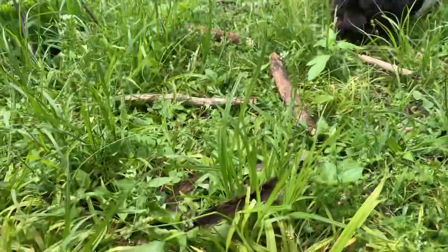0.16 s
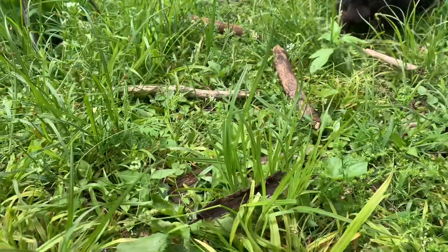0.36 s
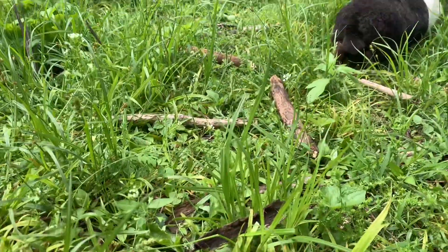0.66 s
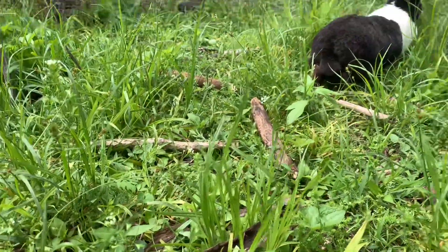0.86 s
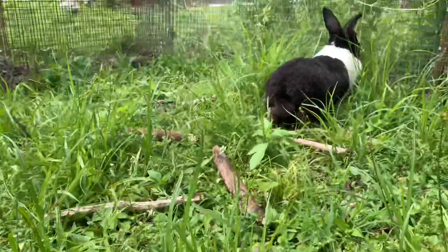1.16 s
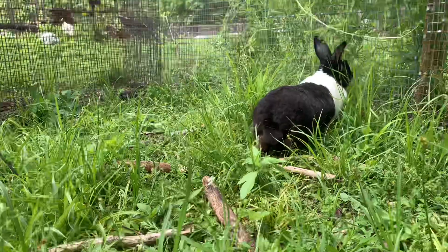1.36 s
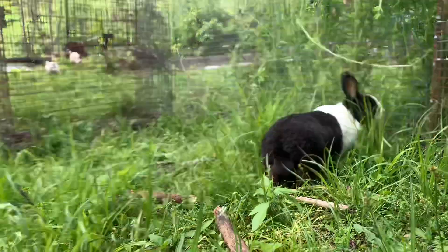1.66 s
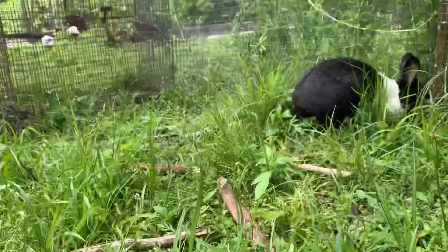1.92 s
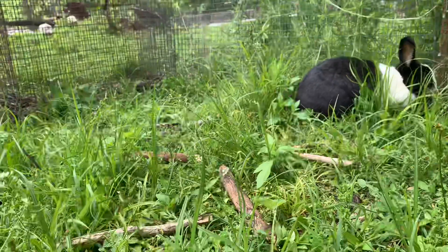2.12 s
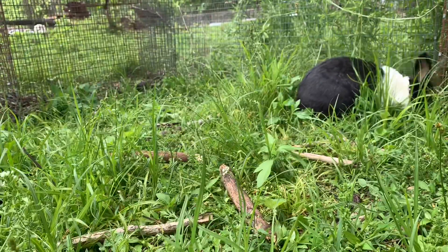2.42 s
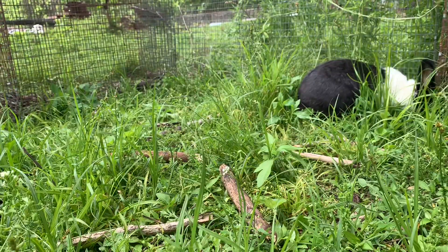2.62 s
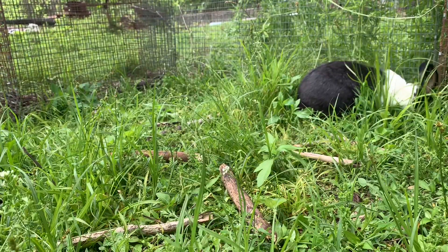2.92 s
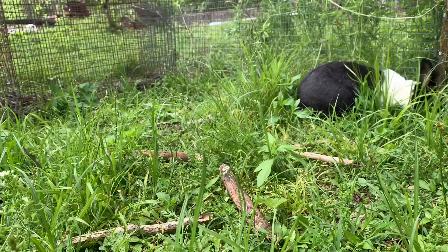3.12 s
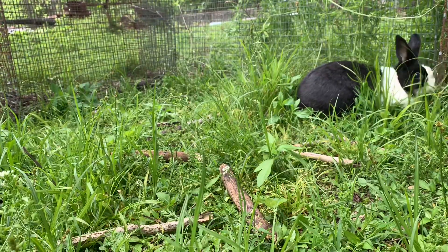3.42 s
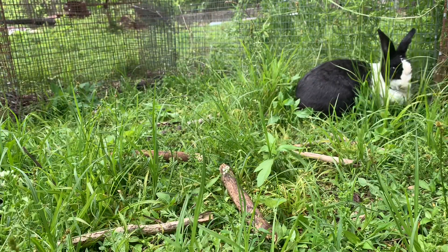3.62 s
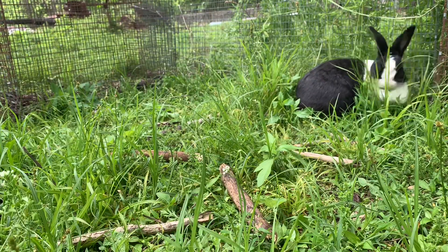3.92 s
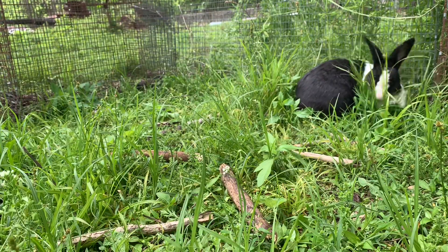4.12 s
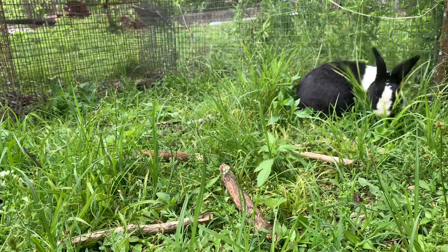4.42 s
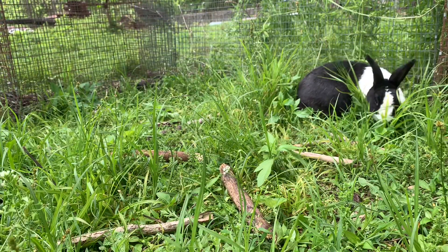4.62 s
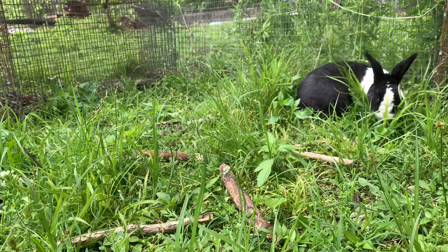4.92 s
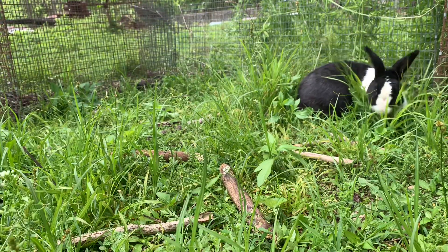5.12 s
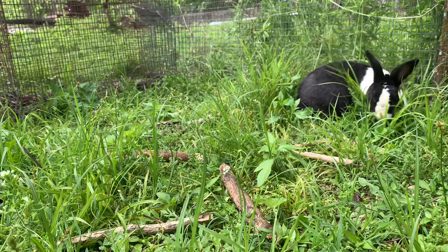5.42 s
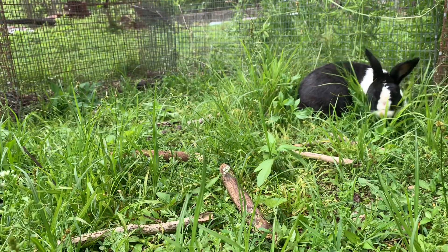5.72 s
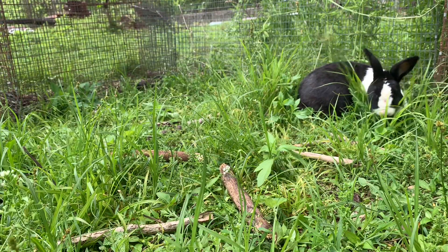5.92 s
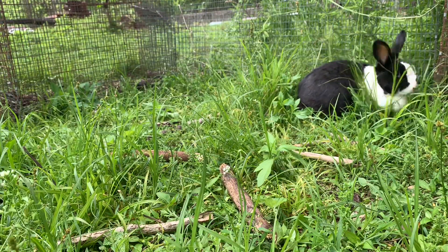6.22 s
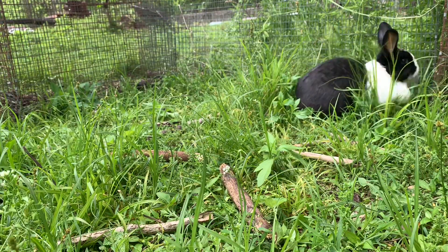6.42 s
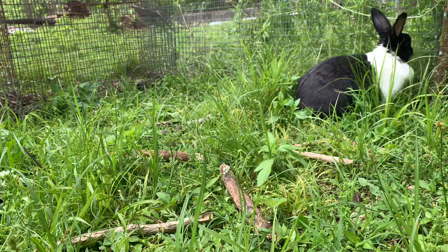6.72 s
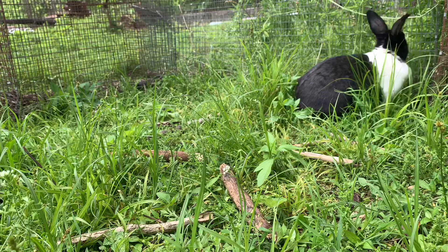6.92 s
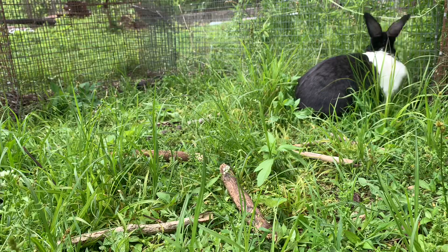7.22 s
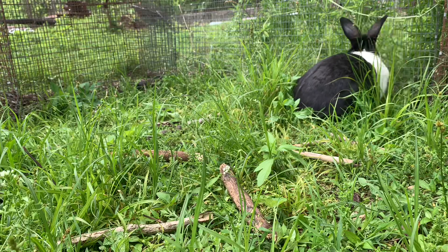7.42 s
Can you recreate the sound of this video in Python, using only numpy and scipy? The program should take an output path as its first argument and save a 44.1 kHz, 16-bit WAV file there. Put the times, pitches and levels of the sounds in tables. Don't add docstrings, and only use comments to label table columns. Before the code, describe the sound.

Outdoor grassy pen, close dry microphone: loud brittle stem cracks and thumps open the scene, then give way to quieter bites, hollow taps and moist chewing. A songbird repeats quick sliding phrases at the start, middle and near the end, with trills and very high thin whistles from others. Leaves hiss softly over a smooth, low distant traffic hum; late on, fine snaps and short fence rasps appear.

```python
import sys
import numpy as np
from scipy import signal
from scipy.fft import rfft, irfft
from scipy.io import wavfile
from scipy.ndimage import uniform_filter1d

SR = 44100
rng = np.random.default_rng(int(sys.argv[2]) if len(sys.argv) > 2 else 0)


def gain_from_db(level_db):
    decades = np.asarray(level_db, float) / 20
    return 10 ** decades


def dump(signal):
    limited = np.clip(np.atleast_2d(signal).T, -1, 1)
    pcm = np.round(limited * 32767).astype(np.int16)
    wavfile.write(sys.argv[1], SR, pcm)


N = 333396
TIME = np.arange(N) / SR
HZ = np.fft.rfftfreq(N, 1 / SR) + 1e-3


def at_hz(points, hz):
    return np.interp(np.log(hz), np.log(np.array(points)[:, 0]), np.array(points)[:, 1])


def curve(rows):
    return np.interp(TIME, *np.transpose(rows))


def drift(rate):
    knots = rng.standard_normal(400)
    return np.interp(TIME * rate * 2, np.arange(400), knots) * 1.04


def band(x, low_hz, high_hz):
    return signal.sosfilt(signal.butter(2, [low_hz, high_hz], "band", fs=SR, output="sos"), x)


def swells(rows, rest_db, axis=2):
    s = TIME[::100]
    power = gain_from_db(2 * rest_db)
    for row in rows:
        middle_s, length_s = row[:2]
        power = power + gain_from_db(2 * row[axis]) * np.exp(-2 * (2 * (s - middle_s) / length_s) ** 2)
    return np.interp(TIME, s, 10 * np.log10(power))


def foliage(x, t60, wet_db, wait_s=0):
    age = np.arange(int(.6 * SR)) / SR
    rise = np.clip((age - wait_s) / 0.0054, 0, 1)
    tail = rng.standard_normal((2, len(age))) * gain_from_db(-60 * age / t60) * rise
    tail = tail / np.sqrt((tail ** 2).sum(axis=1, keepdims=True))
    return gain_from_db(wet_db) * signal.fftconvolve(x[None], tail, axes=1)[:, :N]


def placed(x, pan_db, lag):
    late = np.interp(np.arange(N) - lag, np.arange(N), x)
    return np.array([x * gain_from_db(pan_db / 2), late * gain_from_db(-pan_db / 2)])


def sing(notes, starts=((0, 0),), second_db=-40, flutter_db=2.5):
    flutter = uniform_filter1d(rng.standard_normal(N), size=150) * 12
    out = np.zeros(N)
    for start, level_db in starts:
        for note in notes:
            s, hz, db = np.transpose(note)
            t = np.arange(max(start + s[0], 0), min(start + s[-1], TIME[-1]), 1 / SR)
            turn = 2 * np.pi * np.cumsum(np.interp(t - start, s, hz)) / SR
            edge = np.clip(np.minimum(t - t[0], t[-1] - t) / 0.00092, 0, 1)
            edge = edge * gain_from_db(flutter_db * flutter[(t * SR).astype(int)])
            wave = np.sin(turn) + gain_from_db(second_db) * np.sin(2 * turn)
            level = np.sqrt(2) * gain_from_db(np.interp(t - start, s, db) + level_db)
            first = int(t[0] * SR)
            out[first:first + len(t)] += edge * level * wave
    return out


def glides(rows, change_db):
    return [[(s, from_hz, db), (s + length, to_hz, db + change_db)] for s, length, from_hz, to_hz, db in rows]


def run_of(start, gap, db, count):
    return [(start + gap * k, db) for k in range(count)]


# start in seconds [s], crack peak level [dB], low thump against the crack [dB].
DRY_STEMS = [
    (.1138, -46.5, -1.5),
    (.739, -42.5, -6.5),
    (.756, -45, -8),
    (1.1896, -65.5, 5),
    (1.6466, -41.5, 1),
    (1.8063, -60, 13),
    (5.7815, -43, -32),
]
GREEN_STEMS = [(.6708, -24, 5), (1.5706, -49.5, -21), (1.5937, -48, 4.5), (1.608, -52, -8),
               (1.6122, -43, -22), (1.6318, -40.5, -0.5), (1.637, -43, -10), (1.652, -40, -13),
               (1.666, -44.5, -11), (1.6765, -23, -12.5), (1.6918, -38, -11), (1.7185, -45.5, 4),
               (1.732, -27.5, 2), (1.4, -49, 5.5), (1.8878, -31.5, 0), (1.894, -43, -3), (1.5, -53.5, -3),
               (1.928, -42.5, -3), (5.11, -59, -19), (5.427, -55, -21), (5.8186, -35, -27),
               (5.8678, -47, -25), (5.8885, -38.5, -29), (5.9192, -43.5, -21), (6.005, -50, -13)]
CRISP_STEMS = [(.0962, -47, 4.5), (.2625, -52, -13), (.567, -36, -21), (.6578, -36, -11), (.692, -43, -29),
               (1.0357, -39.5, -5), (1.049, -40.5, -9), (1.6612, -43, 4), (1.6752, -41.5, -25),
               (1.6845, -35.5, -12), (1.7143, -42, -1), (1.7303, -23, -25), (1.7635, -38, -0.5),
               (1.7726, -34, -8), (1.8708, -43.5, -1.5), (6.0871, -50.5, -20)]
THIN_BLADES = [
    (.0145, -60, 10),
    (.031, -64, 0),
    (.6682, -34.5, 1.5),
    (.6702, -35, -14.5),
    (.6755, -41.5, -12),
    (.698, -57, -11),
    (.7035, -61, 3),
    (1.9861, -68.5, 18),
    (5.1603, -66, 1),
]


def snap_swing(age):
    slow = -np.sin(2 * np.pi * 210 * age) * np.exp(-age / 0.0031) * np.clip(age / 0.0049, 0, 1)
    quick = -.5 * np.sin(2 * np.pi * 620 * age) * np.exp(-age / 0.0013)
    ring_hz = 450 + 2566 * np.exp(-age / 0.001182)
    ring = np.sin(2 * np.pi * np.cumsum(ring_hz) / SR) * np.exp(-age / 0.0022)
    return slow + quick + 0.19 * ring


def snaps():
    out, age = np.zeros((2, N)), np.arange(2200) / SR
    swing = snap_swing(age)
    kinds = [(DRY_STEMS, -60), (GREEN_STEMS, -8), (CRISP_STEMS, 1), (THIN_BLADES, 14.5)]
    for (s, db, thump_db), fizz_db in [(row, fizz) for rows, fizz in kinds for row in rows]:
        burst = np.exp(-age / 0.0016) * np.clip(age / 0.00074, 0, 1)
        mid, side = rng.standard_normal((2, len(age))) * burst
        crack = band(mid + 0.28 * side * [[1], [-1]], 660, 3570)
        airy = mid + 1.2 * side * [[1], [-1]]
        fizz = band(airy, 3600, 9300) + 1.13 * band(airy, 5400, 6850)
        sharp = crack / abs(crack).max() + gain_from_db(fizz_db) * fizz / abs(fizz).max()
        bounce = gain_from_db(-18 + 2 * rng.normal())
        sharp = sharp + bounce * np.roll(sharp, int(0.004 * SR * rng.uniform(0.73, 1.6)), axis=1)
        sharp = np.array([sharp[0], np.interp(age - 3.2 / SR, age, sharp[1])])
        lean = gain_from_db(rng.normal(1.0, 0.73) * np.array([[1], [-1]]))
        first = int(s * SR)
        out[:, first:first + len(age)] += gain_from_db(db) * (sharp * lean + gain_from_db(thump_db + 11.5) * swing)
    return out


# start in seconds [s],
# peak level [dB], pitch [Hz], glide as a share of the pitch [ratio], length [ms].
HOLLOW_KNOCKS = [(.027, -36.5, 1140, 0.06, 11), (0.13, -39.5, 1238, 0, 19), (.484, -47.5, 1290, 0.16, 10),
                 (0.8, -42.5, 756, 0.094, 16), (1.34, -43, 790, 0, 18), (1.547, -37, 1203, 0.11, 11),
                 (1.762, -34, 1170, 0.21, 15), (2.656, -39.5, 1214, 0.26, 14), (3.128, -49, 1480, 0, 12),
                 (3.545, -52.5, 994, 0.026, 15), (3.715, -55.5, 1020, 0, 12), (4.039, -38, 1245, 0.52, 9.2),
                 (4.667, -55.5, 1173, 0, 37), (4.696, -48, 1090, 0.06, 19), (4.749, -46.5, 1150, 0.073, 11),
                 (5.482, -50, 945, 0.32, 7.6), (6.323, -55.5, 895, 0.13, 18), (6.681, -54, 680, 0, 16),
                 (6.94, -38.5, 1188, 0.24, 18.6), (7.085, -37, 1150, 0.27, 18),
                 (2.587, -41.5, 1374, 0.3, 9.8), (2.746, -46.5, 1630, -0.36, 13),
                (2.811, -47, 1490, 0.24, 13.3), (2.874, -42.5, 1670, -.25, 14.4),
                (2.974, -44, 1637, -0.49, 15.7), (2.948, -57, 1390, 0.3, 5.9),
                (3.242, -47, 1760, -0.16, 10), (3.373, -46, 1960, 0, 12), (4.247, -42, 1680, 0.21, 10.5),
                (4.494, -48, 1676, -0.089, 7), (4.622, -40, 1574, 0.099, 10),
                (4.731, -55, 2100, -0.023, 9.7), (5.756, -40, 1532, 0.25, 15),
                (5.894, -47, 1620, -0.23, 7.5), (6.027, -49, 1600, -0.025, 9),
                (6.184, -46, 1680, 0.077, 9.4), (7.259, -51, 1715, 0.2, 8.6)]


def knocks():
    out, age = np.zeros(N), np.arange(1800) / SR
    for s, db, hz, glide, ms in HOLLOW_KNOCKS:
        part = np.clip(age * 1000 / ms, 0, 1)
        puff = rng.standard_normal(1800) * np.sin(np.pi * part ** 0.94)
        breath = band(puff, hz * 0.65, hz * 1.27) + 0.79 * puff
        breath = band(band(breath, 564, hz * 1.45), 560, 1920)
        ring = np.sin(2 * np.pi * np.cumsum(hz * (1 + glide * (part - .5))) / SR)
        ring = ring * np.sin(np.pi * part ** 0.96)
        body = breath / abs(breath).max() + 0.78 * ring
        thud = band(rng.standard_normal(1800) * age * np.exp(-age / 0.0043), 506, 1060)
        body = body + 0.5 * thud / abs(thud).max()
        first = int(s * SR) - 60
        out[first:first + 1800] += gain_from_db(db) * body / abs(body).max()
    return out


# middle in seconds [s], length in seconds [s], level [dB].
CHEWING_BOUTS = [(.07, 0.28, -66), (.75, 0.73, -72.5), (1.64, 0.13, -61.5), (1.9, 0.18, -65),
                 (2.75, 0.98, -82), (3.17, 0.77, -70), (3.66, 0.11, -80), (4.68, 0.44, -72.5),
                 (5.05, 1, -76), (5.8, .5, -98), (6.49, 0.11, -70.5), (6.66, 0.071, -65),
                 (6.98, 0.068, -61.5), (4.64, 0.044, -66), (2.82, 0.036, -72), (7.15, 0.55, -78.5)]


def chewing():
    born = (rng.random(N) < 700 / SR) * gain_from_db(3.0 * np.minimum(rng.exponential(1, N), 3))
    born = born * rng.standard_normal(N)
    dealt = rng.integers(0, 8, N)
    out = np.zeros(N)
    for k, hz in enumerate(np.geomspace(700, 2000, 8)):
        out += band(born * (dealt == k) + 1e-18, hz * 0.95, hz * 1.1) / hz ** 1.75
    return out / out.std() * gain_from_db(swells(CHEWING_BOUTS, rest_db=-84) - 2.5)


# start in seconds [s], level [dB], length in seconds [s].
FENCE_RUBS = [
    (6.187, -65.5, 0.05),
    (6.677, -66, 0.053),
    (7.098, -64, 0.035),
    (7.52, -61, 0.079),
]
# pitch [Hz], width [Hz], level [dB].
WIRE_TONES = [(840, 490, -6.5), (2270, 160, -8), (3125, 133, -9), (3770, 230, -11.5), (4360, 180, -18)]


def fence():
    noise = rng.standard_normal(N)
    rub = np.zeros(N)
    for s, db, length in FENCE_RUBS:
        rub += gain_from_db(db) * np.sin(np.pi * np.clip((TIME - s) / length, 0, 1)) ** 0.25
    rasp = np.zeros(N)
    for hz, width, db in WIRE_TONES:
        line = band(noise, hz - width / 2, hz + width / 2)
        rasp += gain_from_db(db + 5.0 * drift(15)) * line / line.std()
    return rub * rasp


# start in seconds [s], length in seconds [s], first pitch [Hz],
# last pitch [Hz], starting level [dB].
LOW_PEEPS = [(3.37, 0.014, 1843, 1770, -44), (5.23, 0.034, 2140, 2020, -67), (7.0, 0.04, 2100, 2050, -70.5),
             (4.5, 0.039, 1594, 1440, -74), (4.735, 0.043, 2010, 2380, -65), (4.94, .03, 1470, 1250, -70),
             (5.05, .05, 1310, 1270, -78), (5.745, 0.011, 2300, 2220, -65.5), (7.1, 0.042, 930, 873, -52),
             (6.195, 0.024, 890, 850, -57), (6.69, 0.042, 895, 950, -59), (7.085, .02, 2250, 2300, -67),
             (7.425, 0.034, 2014, 1853, -62.5)]


def peeps():
    return sing(glides(LOW_PEEPS, change_db=-18))


# seconds from the turn [s], pitch [Hz], level [dB].
SONG_HIGH = [
    [(0, 5830, -11.5), (.03, 5530, -3.5), (.055, 5200, -9.5), (.075, 5100, -15)],
    [(.15, 9940, -13.5), (.16, 6600, -8)],
    [(.19, 8080, -4.5), (.207, 6080, -6.5)],
]
SONG_LOW = [
    [(-.082, 3950, -17), (-.05, 4550, -14.5), (-.02, 4620, -10), (0, 4580, -25)],
    [(.082, 3750, -16), (.096, 4250, -13), (.11, 3900, -14)],
    [(.167, 4600, -13), (.176, 5300, -4), (.192, 5300, -30)],
]
# start in seconds [s], level [dB], low notes against the high ones [dB].
SONG_TURNS = [
    (.228, -41.5, -2),
    (0.522, -42, -1.5),
    (3.693, -42.5, -0.5),
    (4.001, -42.5, 3.5),
    (6.265, -39, 1),
    (6.572, -39, 4),
]
# seconds from its start [s], pitch [Hz], level [dB].
CHIP_NOTE = [
    [(0, 8030, 31.5), (.02, 6300, 21)],
]
# start in seconds [s], level [dB].
LONE_CHIPS = [
    (0.097, -78),
    (3.56, -85),
    (4.174, -77),
    (6.148, -78),
]


def songbird():
    high = sing(SONG_HIGH, [(s, db) for s, db, low_db in SONG_TURNS])
    low = sing(SONG_LOW, [(s, db + low_db) for s, db, low_db in SONG_TURNS])
    five_chips = run_of(4.608, 0.159, -84.5, count=5)
    return high + low + sing(CHIP_NOTE, LONE_CHIPS + five_chips)


# seconds from its start [s], pitch [Hz], level [dB].
TRILL_OPENING = [
    [(0, 5870, -2), (.02, 5230, -2.5)],
    [(.022, 4950, 3), (.038, 3700, -16), (.07, 4570, -2.5)],
]
# start in seconds [s], level [dB].
TRILL_STARTS = [
    (2.206, -56.5),
    (5.579, -60.5),
]


def trill():
    notes = list(TRILL_OPENING)
    starts_s = 0.1 + 0.022 * np.arange(10)
    for s, hz, db in zip(starts_s, np.geomspace(6600, 4240, 10), np.linspace(0, -5.0, 10)):
        notes.append([(s, hz * 0.93, db), (s + 0.0085, hz * 1.114, db)])
    return sing(notes, TRILL_STARTS)


# start in seconds [s], length in seconds [s],
# first pitch [Hz], last pitch [Hz], starting level [dB].
GROWING_NOTES = [(4.803, 0.0051, 15500, 11500, -58), (6.125, 0.0083, 14000, 11300, -71),
                 (.955, 0.069, 4000, 6140, -84), (1.005, .035, 6140, 5910, -69),
                 (1.93, 0.088, 7100, 9000, -77), (2.04, 0.041, 9000, 5940, -72),
                 (2.735, 0.011, 4700, 6000, -73.5), (2.825, 0.018, 4350, 5530, -79.5),
                 (3.252, 0.0235, 5900, 6870, -80), (3.328, 0.013, 5500, 8640, -78),
                 (5.51, 0.031, 5660, 12040, -69.5), (6.12, 0.027, 4200, 5700, -77.5)]
FADING_NOTES = [(.905, .05, 6840, 4100, -85), (1.07, 0.01, 7160, 6600, -59),
                (2.135, 0.019, 4950, 9330, -60.5), (2.145, 0.14, 6500, 5830, -75),
                (3.017, 0.016, 6700, 5910, -71), (3.075, .02, 9000, 5800, -72),
                (3.458, .012, 5500, 7100, -62), (3.472, .01, 7140, 5940, -63),
                (3.04, .012, 6800, 6030, -71), (3.28, 0.026, 7000, 6000, -74),
                (.035, .035, 7550, 8100, -70), (.075, .02, 4480, 5330, -61),
                (4.01, 0.063, 6680, 6650, -65.5), (7.21, 0.042, 11600, 6140, -76.5),
                (7.35, 0.012, 11050, 10400, -68), (7.455, 0.018, 6600, 5800, -72)]


def single_notes():
    return sing(glides(GROWING_NOTES, change_db=12.5) + glides(FADING_NOTES, change_db=-4))


# seconds from its start [s], pitch [Hz], level [dB].
SLIDE_NOTE = [
    [(-.004, 15800, 4), (.014, 14000, 4), (.024, 13300, 4), (.037, 9800, 2), (.041, 8200, -4)],
]
DROP_NOTE = [
    [(0, 13200, -5), (.012, 10330, 1), (.026, 9500, 1)],
]
RISE_NOTE = [
    [(0, 9270, 5), (.018, 12970, 1.5), (.026, 12900, 10)],
]
# start in seconds [s], level [dB].
SLIDE_STARTS = [(.215, -70), (0.335, -63), (0.454, -62.5), (0.567, -60.5), (.775, -64), (1.22, -76),
                (3.849, -96), (3.957, -74), (4.06, -69), (4.165, -66), (4.69, -84), (5.27, -71.5),
                (5.388, -69.5), (5.494, -72)]
RISE_STARTS = [
    (.88, -65),
    (.955, -63.5),
    (4.28, -67),
    (4.343, -69.5),
    (4.434, -74),
    (4.517, -70),
    (5.619, -69.5),
    (5.715, -70),
]
# start in seconds [s], gap in seconds [s], level [dB].
DROP_RUNS = [
    (7.028, .051, -78),
    (7.422, .06, -74),
]


def thin_notes():
    drops = run_of(*DROP_RUNS[0], count=3) + run_of(*DROP_RUNS[1], count=3)
    return sing(SLIDE_NOTE, SLIDE_STARTS) + sing(DROP_NOTE, drops) + sing(RISE_NOTE, RISE_STARTS)


# time in seconds [s], pitch [Hz], level [dB].
FAR_WHISTLES = [
    [(0, 1288, -62.5), (.3, 1291, -65.5), (.56, 1220, -62.5), (.59, 1270, -81)],
    [(4.003, 2227, -44), (4.02, 2228, -38), (4.037, 2225, -51)],
    [(4.042, 2230, -52), (4.052, 2220, -45), (4.06, 2210, -52)],
    [(4.062, 2133, -49), (4.085, 2107, -38), (4.12, 2087, -46.5), (4.138, 2090, -49)],
]
# start in seconds [s], length in seconds [s], first pitch [Hz], last pitch [Hz], level [dB].
SLOW_MOAN = [
    (5.96, 0.22, 704, 918, -73),
]


def far_whistles():
    return sing(FAR_WHISTLES, second_db=-15, flutter_db=0.8) + sing(glides(SLOW_MOAN, change_db=1.5))


# pitch [Hz], side against middle [dB].
NOISE_WIDTH = [(60, -29), (110, -18.5), (380, -14), (700, -10), (2380, 1), (15000, 0.5)]


def coloured(spectrum, source):
    gain = gain_from_db(at_hz(spectrum, HZ))
    width = gain_from_db(at_hz(NOISE_WIDTH, HZ))
    mid, side = irfft(rfft(source) * gain * [np.ones(len(HZ)), width], N)
    return np.array([mid + side, mid - side]) / mid.std()


# pitch [Hz], level per Hz [dB].
LEAF_COLOUR = [(410, -30), (700, -0.5), (1080, -3), (1220, -10), (2490, -7), (4280, -7.5), (5090, -7),
               (14600, -14), (15900, -14), (16500, -29)]
# middle in seconds [s], length in seconds [s],
# coarse stems [dB], fine blades [dB].
GRASS_STIRS = [(0.0, 0.23, -89, -82.5), (.62, 0.97, -89, -81), (.88, 0.42, -109, -80),
               (1.35, 0.36, -95, -87), (1.7, 0.35, -94.5, -88.5), (2.04, 0.34, -90, -80),
               (2.8, 0.13, -91, -90.5), (3.16, 0.17, -84.5, -76), (3.36, 0.21, -85, -84.5),
               (3.345, 0.022, -79, -71), (3.66, .3, -77.5, -79.5), (3.87, 0.091, -82, -74),
               (4.08, 0.3, -80.5, -76.5), (4.24, 0.058, -75, -74), (4.305, 0.037, -78, -87),
               (4.4, 0.44, -111, -86.5), (4.82, 0.12, -111, -83), (5.62, 0.055, -76.5, -84),
               (5.87, .2, -80.5, -99), (6.15, 0.16, -88, -80)]


def rustle():
    grains = (rng.random((2, N)) < 2500 / SR) * gain_from_db(3.0 * np.minimum(rng.exponential(1, (2, N)), 3))
    leaves = rfft(coloured(LEAF_COLOUR, rng.standard_normal((2, N)) * (1 + 1.8 * grains)))
    gusts_db = 1.6 * drift(9)
    stems_db = swells(GRASS_STIRS, rest_db=-96.5)
    blades_db = swells(GRASS_STIRS, rest_db=-91.5, axis=3)
    place = np.clip(np.log2(HZ / 2000) * 2, 0, 6)
    out = np.zeros((2, N))
    for k, share in enumerate(np.clip(np.linspace(-.3, 1.2, 7), 0, 1)):
        level_db = (1 - share) * (stems_db + 16) + share * (blades_db + 13)
        patch_db = 2.4 * drift(16) + gusts_db
        strip = irfft(leaves * np.clip(1 - abs(place - k), 0, 1), N)
        out += strip * gain_from_db(level_db + patch_db)
    return out


# time in seconds [s], level [dB].
MOTOR_LEVEL = [(0, -57.5), (1.0, -53.5), (2.0, -60), (3.2, -60.5), (4.5, -67), (4.8, -58), (5.35, -56),
               (5.6, -64), (5.85, -59.5), (6.15, -54.5), (6.3, -68.5), (7.55, -65)]


def motor():
    turn = 2 * np.pi * np.cumsum(248.3 + 1.515 * drift(2.5)) / SR
    return np.sqrt(2) * gain_from_db(curve(MOTOR_LEVEL) - 1) * (np.sin(turn) + gain_from_db(-18.5) * np.sin(2 * turn))


# pitch [Hz], level per Hz [dB].
HUM_COLOUR = [(15, -61), (25, -15.5), (112, -2.5), (243, -5), (393, -18), (556, -25.5), (900, -42),
              (1080, -44), (1640, -53), (3250, -62), (5500, -120)]
# time in seconds [s], level [dB].
HUM_STRENGTH = [
    (0.0, -47.5),
    (1.22, -51.5),
    (1.62, -48.5),
    (2.3, -50.5),
    (5.52, -50.5),
    (7.56, -51.5),
]


def hum():
    traffic = coloured(HUM_COLOUR, rng.standard_normal((2, N)))
    traffic = traffic * gain_from_db(curve(HUM_STRENGTH) + 1.0 * drift(6.7))
    return band(traffic + motor(), 22, 7000) * gain_from_db(np.array([[-.55], [.55]]))


def scene():
    near = snaps()
    near = near + foliage(near.mean(axis=0), 0.012, -16)
    hollow = knocks() + fence() + chewing() + peeps()
    near = near + placed(hollow, 1.0, 1.0) + foliage(hollow, 0.11, -9.0, wait_s=0.0045)
    song, triller, thin, low = songbird(), trill() + single_notes(), thin_notes(), far_whistles()
    birds = placed(song, 1.5, 1.4) * gain_from_db(-16.5) + foliage(song, 0.34, -11.5)
    birds = birds + placed(triller, 1.8, 1.44) + foliage(triller, 0.21, -1.8)
    birds = birds + placed(thin, .3, .6) * gain_from_db(-2.5) + foliage(thin, .3, -2)
    birds = birds + placed(low, 0.47, 5.2) + foliage(low, 0.75, -12.0, wait_s=0.027)
    return near + birds + rustle() + hum()


def roll_off(x):
    return signal.sosfilt(signal.butter(12, 16690, fs=SR, output="sos"), x)


TREBLE_OPEN = (2.73, 3.84)


def record(dry):
    hz, s, cells = signal.stft(band(dry, 45, 19000), SR, nperseg=2048, noverlap=1024)
    power = (abs(cells[:, :1024]) ** 2).reshape(2, 32, 32, -1).sum(axis=(0, 2))
    level_db = 10 * np.log10(power + 1e-14)
    masker_db = np.max([np.roll(level_db, k, axis=0) - 21 - 2 * k for k in (1, 2, 3)], axis=0)
    centre = hz[16:1024:32, None]
    drowned = (level_db < masker_db) & (centre > 4300)
    closed = (s < TREBLE_OPEN[0]) | (s > TREBLE_OPEN[1])
    floor_db = -93 + 6 * np.clip((centre - 13000) / 1100, -1.0, 1.3)
    faint = closed & (level_db + rng.normal(0, 4.5, level_db.shape) < floor_db)
    cells[:, :1024] *= np.repeat(~(faint | drowned), 32, axis=0)
    mix = signal.istft(cells, SR, nperseg=2048, noverlap=1024)[1][:, :N]
    return roll_off(mix)


dry = scene()
out = record(dry)
dump(out)
```